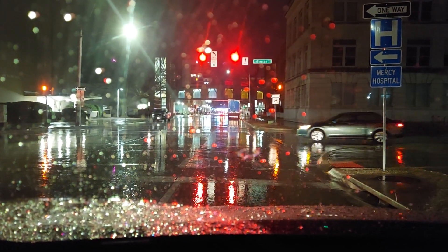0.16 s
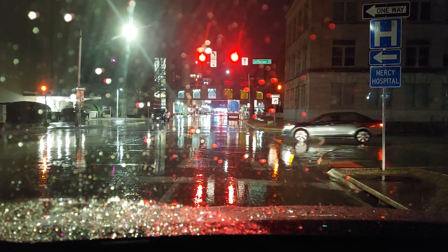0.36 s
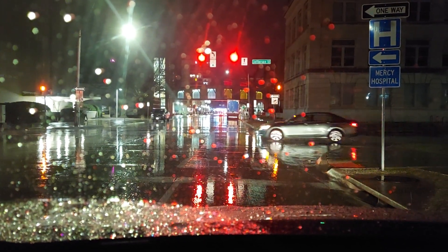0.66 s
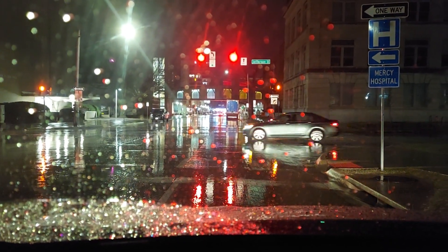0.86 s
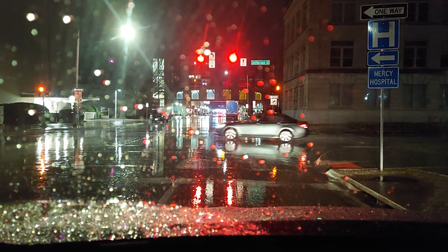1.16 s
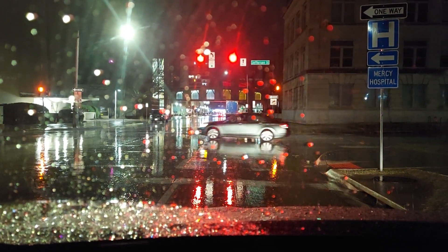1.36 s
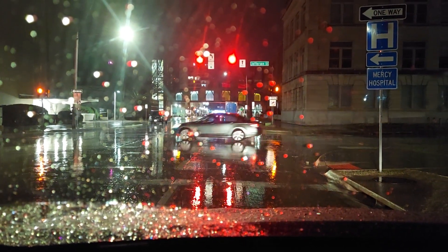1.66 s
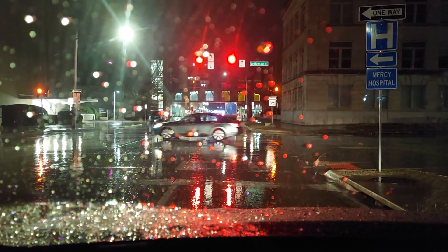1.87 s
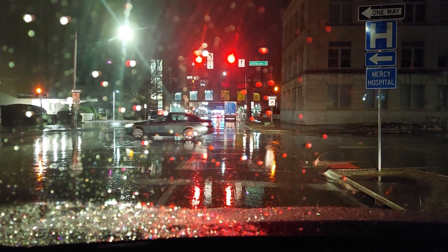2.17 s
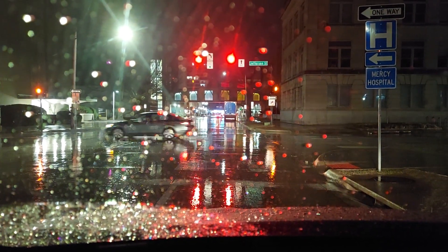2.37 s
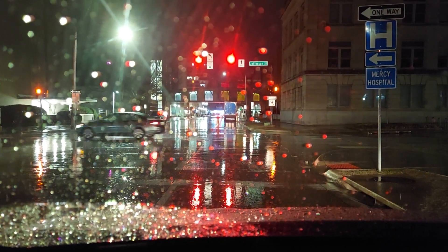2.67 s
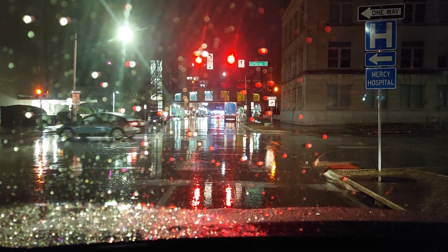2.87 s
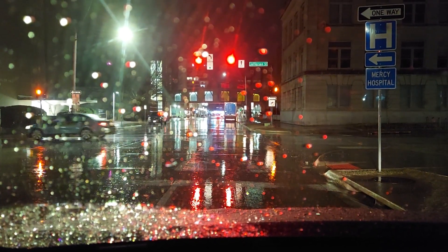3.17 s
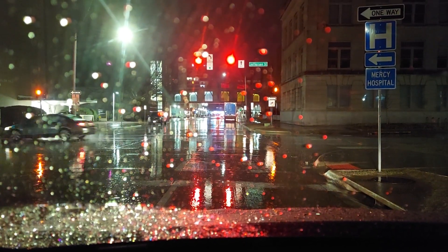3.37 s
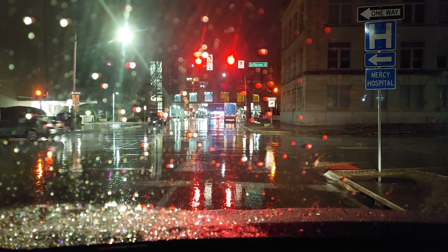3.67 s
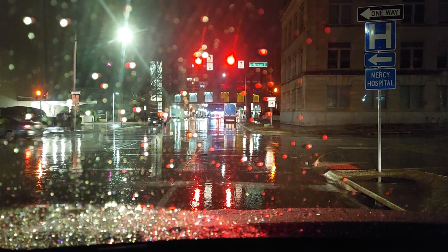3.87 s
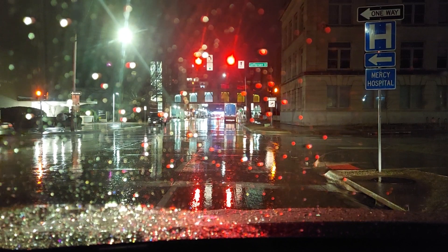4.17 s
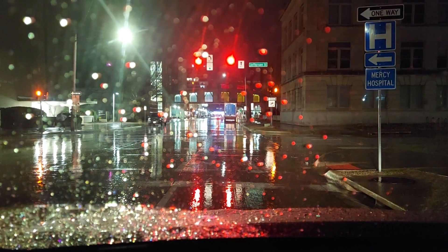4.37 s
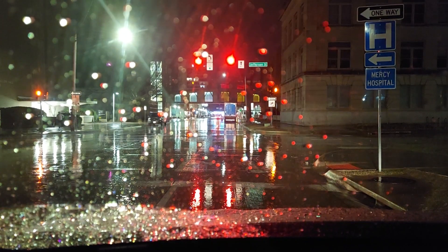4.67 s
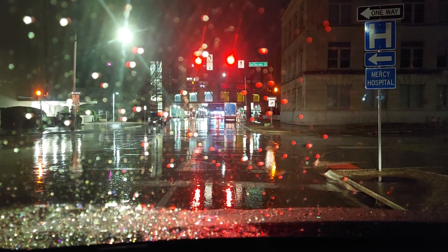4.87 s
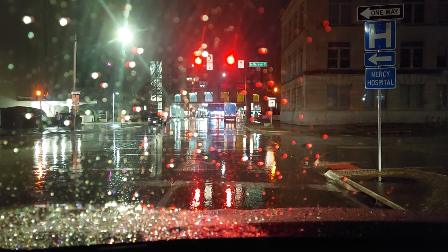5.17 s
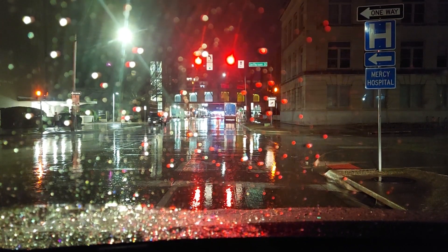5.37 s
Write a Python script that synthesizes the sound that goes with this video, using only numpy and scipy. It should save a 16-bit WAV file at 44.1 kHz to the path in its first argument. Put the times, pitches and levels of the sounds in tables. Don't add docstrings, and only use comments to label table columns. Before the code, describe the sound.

Close stereo sound inside a parked, idling car at night in the rain. Sharp drops click on the windshield and duller ones thud on the lined steel roof, densest in the first two seconds, then sparser and uneven. Underneath are a low engine hum, faint street hiss and a boomy cabin hum that swells briefly around one and a half seconds as a car crosses ahead.

```python
import sys
import numpy as np
from scipy import signal
from scipy.fft import rfft, irfft, next_fast_len
from scipy.io import wavfile
from scipy.ndimage import map_coordinates

SR = 44100
rng = np.random.default_rng(int(sys.argv[2]) if len(sys.argv) > 2 else 0)


def volts_from_decibels(level):
    exponent = np.asarray(level, float) / 20
    return 10 ** exponent


def generate_wav(sig):
    pcm = np.round(np.clip(np.atleast_2d(sig).T, -1, 1) * 32767).astype(np.int16)
    wavfile.write(sys.argv[1], SR, pcm)


N = 244314
T = np.arange(N) / SR


def unit(x):
    return x / np.sqrt(np.mean(x ** 2) + 1e-20)


def along(points, hz):
    f, v = np.transpose(points)
    return np.interp(np.log(hz + 1), np.log(f + 1), v)


def curve(rows, axis):
    return np.interp(T, np.array(rows)[:, 0], np.array(rows)[:, axis])


def wobble(rate):
    return map_coordinates(rng.standard_normal(int(N * rate / SR) + 4), [T * rate])


def filtered(x, response):
    m = next_fast_len(x.shape[-1] + 4096)
    spectrum = rfft(x, m) * response(np.fft.rfftfreq(m, 1 / SR))
    return irfft(spectrum, m)[..., :x.shape[-1]]


def resonant(modes):
    def response(hz):
        total = 0
        for k, (centre, width, db) in enumerate(modes):
            mode = 1j * hz * width / (centre * centre - hz * hz + 1j * hz * width)
            total = total + (-1) ** k * volts_from_decibels(db / 2) * mode
        return total ** 2
    return response


def noise(spectrum):
    return unit(filtered(rng.standard_normal((2, N)), lambda hz: volts_from_decibels(along(spectrum, hz))))


EAR_LAG = rng.integers(-22, 26, size=200)


def answers(click_db, modes, t60, rise):
    t = np.arange(SR // 10) / SR
    count = len(click_db)
    hard = volts_from_decibels(click_db - click_db.mean())[:, None, None]
    fade = volts_from_decibels(-60 * t / t60) + 0.8 * np.sqrt(hard) * volts_from_decibels(-60 * t / (t60 / 5))
    fade *= 1 - np.exp(-t * np.sqrt(hard) / rise)
    fade *= np.cos(5 * np.pi * t)
    echo = rng.standard_normal((count, 2, len(t))) * fade
    echo *= volts_from_decibels(4.53 * rng.standard_normal((count, 2, len(t) // 30)).repeat(30, axis=2))
    echo[:, 0, 40] += volts_from_decibels(click_db)
    echo[np.arange(count), 1, 40 + EAR_LAG[:count]] += volts_from_decibels(click_db)
    spot = [(hz, width, db + rng.normal(0, 1.5, (count, 1, 1))) for hz, width, db in modes]
    out = filtered(echo, resonant(spot))
    return out / np.abs(out).max(axis=(1, 2), keepdims=True)


def place(sounds, seconds, db):
    out = np.zeros((2, N + SR))
    for sound, s, gain in zip(sounds, seconds, volts_from_decibels(db)):
        start = max(round(s * SR), 0)
        out[:, start:start + sound.shape[1]] += gain * sound
    return out[:, :N]


def patter(modes, rate, spread_db, t60, rise, count):
    falls = rng.random((count, N)) < rate / count / SR
    size = np.minimum(rng.exponential(size=(count, N)), 4)
    hits = falls * volts_from_decibels(spread_db * size)
    tails = answers(np.full(count, 10.), modes, t60, rise)
    return unit(signal.fftconvolve(hits[:, None], tails, axes=2)[..., :N].sum(axis=0))


# freq_hz, level_db (per Hz)
RUMBLE_SPECTRUM = [(15, -54), (30, -39), (45, -6), (62, 0), (73, -5), (105, 3.5), (135, -22), (165, -11.5),
                   (350, -11), (520, -28.5), (880, -120)]
# freq_hz, level_db (per Hz)
HISS_SPECTRUM = [(240, -53), (400, -30), (700, -14.5), (1500, -10.5), (3200, -16), (4500, -23.5),
                 (8300, -34.5), (9700, -38), (12000, -30), (15600, -37)]


def street_air():
    street = volts_from_decibels(-64.5 + 0.5 * wobble(18) + 1.4 * wobble(22.02)) * noise(HISS_SPECTRUM)
    return volts_from_decibels(-46 + 0.46 * wobble(3.29)) * noise(RUMBLE_SPECTRUM) + street


# multiple (of the idle rate), level_db (rms)
IDLE_ORDERS = [(2, -48), (3, -57), (4, -61.5), (5, -49), (6, -54.5)]


def engine():
    idle_hz = 20.84
    turn = 2 * np.pi * np.cumsum(idle_hz * (1 + 0.0053 * wobble(2.5))) / SR
    out = 0
    for k, db in IDLE_ORDERS:
        strength = volts_from_decibels(db + 2.5 + .3 * k * wobble(9))
        out = out + strength * np.sin(k * turn + rng.uniform(0, 6))
    return out


# freq_hz, level_db (rms)
WHINE_LINES = [(10200, -95), (10400, -92), (10600, -91), (10800, -92), (11000, -95)]
# time_s, level_db
WHINE_SWITCH = [
    (3.33, -40),
    (3.345, 0),
    (4.915, 0),
    (4.925, -12),
    (4.95, -12),
    (4.96, 0),
    (5.54, 0),
]


def whine():
    lines = sum(volts_from_decibels(db + 5) * np.sin(2 * np.pi * hz * T) for hz, db in WHINE_LINES)
    hiss = unit(filtered(rng.standard_normal((2, N)), resonant([(10760, 870, 0)])))
    chop = unit(np.exp(1.5 * np.cos(2 * np.pi * 200 * T)))
    switch = volts_from_decibels(np.interp(T, *np.transpose(WHINE_SWITCH), left=-60))
    return switch * (lines + volts_from_decibels(-80) * chop * hiss)


def boom():
    level_db, sway_db, rain_share, shake_db = -53, 3, 0.58, 2.5
    pass_s, pass_span_s, pass_db = 1.54, 0.18, 8
    mode = resonant([(128.6, 25.7, 0)])
    rain_db = curve(RAIN, axis=1)
    swell_db = level_db + pass_db / (1 + ((T - pass_s) / pass_span_s) ** 2)
    swell_db = swell_db + rain_share * (rain_db - rain_db.mean()) + sway_db * wobble(2.73)
    hum = volts_from_decibels(swell_db) * unit(filtered(rng.standard_normal(N), mode))
    s, db = np.transpose(ROOF_BLOWS)[:2]
    push = volts_from_decibels(db + shake_db + 39.5) * rng.standard_normal(len(s))
    blows = np.bincount(np.round(s * SR).astype(int), push, N)
    return hum + filtered(blows, mode)


# time_s, level_db
RAIN = [(0, -54), (.18, -51.5), (.59, -55), (.82, -56), (1.08, -51.5), (1.59, -61.5), (1.97, -54),
        (2.33, -65), (2.59, -60), (2.73, -61), (2.96, -56), (3.08, -60.5), (3.49, -63), (3.75, -60),
        (4.58, -58), (4.88, -54.5), (4.98, -62.5), (5.3, -60.5)]
# freq_hz, width_hz, level_db
ROOF_MODES = [(127.6, 49.5, -5), (215, 120, 0), (348.5, 106, -1), (494, 163, -7)]


def shower():
    drum_db, rain_share = -53.5, 0.43
    shell = BODY_MODES + GLASS_MODES + [(4800, 2000, -10), (8000, 2500, -20)]
    fine = patter(shell, 210, 3.5, .045, .0008, count=5)
    drum = patter(ROOF_MODES, 150, 2, .12, .004, count=5)
    rain_db = curve(RAIN, axis=1)
    return volts_from_decibels(rain_db) * fine + volts_from_decibels(drum_db + rain_share * (rain_db - rain_db.mean())) * drum


# start_s, peak_db
TICK_DROPS = [(0.0867, -44), (0.7442, -58), (0.9472, -45), (1.0365, -49), (1.1164, -42.5), (1.3606, -41),
              (1.4102, -42.5), (1.9604, -53), (2.0288, -47), (2.1849, -42), (2.2628, -49), (2.56, -50),
              (3.0964, -57), (3.3009, -49), (3.322, -41), (3.4715, -53), (3.4984, -54), (3.7319, -59),
              (3.7658, -61), (3.8048, -64), (3.8686, -47), (3.888, -42.5), (3.9304, -50), (3.9749, -45),
              (4.221, -36), (4.2662, -47), (4.6114, -44), (4.9137, -55), (5.3502, -48), (5.5174, -60)]
# freq_hz, width_hz, level_db
TICK_MODES = [(3170, 1800, 0), (5460, 1650, -5.5), (8900, 1900, -13.5)]


def ticks():
    s, db = np.transpose(TICK_DROPS)
    clear = answers(np.full(len(s), 22.), TICK_MODES, t60=0.065, rise=0.0012)
    sprinkle = patter(TICK_MODES, 90, 1.2, 0.023, 0.00026, count=5)
    return place(clear, s, db - 1.5) + volts_from_decibels(curve(RAIN, axis=1) - 14) * sprinkle


# start_s, peak_db, panel_hz, knock_db
ROOF_BLOWS = [(.001, -27.5, 231, -7), (.171, -35, 215, 1.5), (.239, -31, 182, -13.5), (.317, -39.5, 240, 1),
              (.536, -31.5, 218, -13), (.68, -38.5, 187, -5.5), (.796, -38, 182, 0),
              (.893, -22.5, 229, -16), (0.973, -38, 320, -18), (1.168, -37, 198, -5),
              (1.271, -45, 226, -15), (1.491, -43.5, 326, -1.5), (1.547, -45, 322, 0.5),
              (2.481, -44, 288, -7), (2.68, -38, 190, -6), (2.709, -32, 180, -30),
              (2.893, -27.5, 209, -11.5), (3.015, -36, 199, -15), (3.411, -31.5, 215, -12.5),
              (3.639, -38.5, 166, -2.5), (3.745, -43, 187, -27), (4.13, -32, 263, -10.5),
              (4.39, -32, 203, -8), (4.541, -45.5, 200, -0.5), (4.685, -42.5, 195, -16),
              (4.775, -37.5, 200, -4), (5.021, -35, 232, -9.5), (5.26, -31.5, 256, -11),
              (5.287, -29, 170, -2), (5.411, -41.5, 194.5, -14)]
# freq_hz, width_hz, level_db
KNOCK_MODES = [(371, 112, 3.5), (544, 119, 0), (769, 125, -5)]


def thuds():
    t = np.arange(SR // 6) / SR
    s, db, hz, knock_db = np.transpose(ROOF_BLOWS)
    detune = rng.normal(0, 0.227, (len(s), 2, 1)) * [[0], [1]]
    pitch = hz[:, None, None] * np.exp(detune)
    phase = rng.uniform(0, 3.16, (len(s), 2, 2, 1))
    ring = np.sin(2 * np.pi * pitch[:, None] * t + phase) * volts_from_decibels([[0], [-7]])
    ring = ring.sum(axis=2) * volts_from_decibels(-60 * t / 0.12) * (1 - np.exp(-t / 0.00093))
    knock = answers(np.full(len(s), 22.), KNOCK_MODES, t60=.13, rise=.004)
    return place(ring, s - .002, db - 4) + place(knock, s - .002, db + knock_db + 7.0)


# start_s, tap_db, body_db, splash_db
GLASS_DROPS = [(.0423, -24.5, -14, -16), (.3197, -21, -11.5, -16), (.3471, -32.5, -14, -9.5),
               (.4179, -30.5, -14, -11.5), (.4682, -32, -13, -10), (.5386, -34, -2, -15),
               (.6065, -44.5, -27, -4), (.8104, -45, -13, -16.5), (.8854, -35, -5, -14),
               (.9773, -33, -27, -20), (1.278, -38.5, -11, -18.5), (1.494, -30, -10, -15.5),
               (1.5359, -38.5, -18, -35), (1.5494, -23, -11.5, -14), (1.5994, -43, -10, -9.5),
               (1.701, -41.5, -13, -16), (1.988, -46.5, -16, -18), (2.1282, -41, -18, -13.5),
               (2.4834, -27.5, -6.5, -18.5), (3.8521, -39, -8, -21), (3.9547, -43, -6, -15),
               (4.1136, -39.5, -15, -18), (4.1306, -27, -11.5, -17), (4.2909, -43.5, -13, -11),
               (4.3915, -28.5, -7.5, -15.5), (4.4528, -38, -12, -20), (4.779, -28.5, -10, -13.5),
               (4.8577, -37.5, -7, -35), (4.952, -40.5, -33, -20), (5.2586, -28.5, -11, -13.5)]
# start_s, tap_db, body_db, splash_db
ROOF_DROPS = [(.0014, -36, -0.5, -11.5), (.1123, -32.5, -13, -9.5), (.1535, -30.5, -8.5, -10.5),
              (.1782, -36, 1, -11), (.2144, -37.5, -6, -10), (.2395, -35, -7, -11), (.4447, -34, -14, -26),
              (.6764, -41.5, -1, -9.5), (.7733, -32, -11, -11), (.7986, -31, -8, -9.5),
              (.89, -30.5, -1.5, -18), (1.073, -42, -10, -10), (1.1697, -39, -2, -8.5),
              (1.3738, -41.5, -4, -9), (1.752, -42.5, -3, -15), (1.797, -37, -15, -12),
              (1.8998, -40, -7, -11), (2.6745, -40.5, 0, -16.5), (2.7908, -45.5, 2, -13),
              (2.829, -37.5, -2, -8.5), (2.8881, -35.5, -1, -17.5), (3.0107, -42, -5.5, -16.5),
              (3.4039, -48.5, 7, -12), (3.6388, -41.5, 2.5, -13), (4.4275, -39, -14, -16),
              (4.708, -40, -14, -20), (4.8314, -41.5, 0, -15), (4.9772, -37.5, -5.5, -15),
              (4.9956, -40, -1.5, -10), (5.2824, -36, -1.5, -26)]
# start_s, tap_db, body_db
LIGHT_DROPS = [(.2715, -35.5, -15), (.405, -52, -16), (.513, -38, -9), (.618, -37, -18), (.6484, -38, -11),
               (1.002, -47, -9), (1.1963, -44.5, 1), (1.2361, -45, -10), (1.3219, -47, -1),
               (1.448, -47.5, -6), (1.8572, -45.5, -17), (2.0646, -43.5, -6.5), (2.2262, -55, -22),
               (2.3396, -45, -8.5), (2.581, -49.5, 3), (2.6354, -47, -4), (3.1363, -43.5, -11),
               (3.183, -43, -13), (3.273, -46.5, 3), (3.355, -44.5, -13), (3.3776, -42.5, -6),
               (3.997, -46, -18), (4.0164, -44, -3), (4.1888, -43, -6), (4.5386, -45.5, 1),
               (4.6404, -42.5, -29), (4.68, -49, -4), (5.0153, -43, -3), (5.154, -46, -15),
               (5.207, -44, -13)]


def clear_drops():
    strays, stray_db, stray_body_db, scatter_db = 30, 10.5, -7, 1.5
    chance = rng.standard_normal((strays, 3))
    s = (np.arange(strays) + rng.random(strays)) * N / SR / strays
    tap = np.interp(s, *np.transpose(RAIN)) + stray_db + scatter_db * chance[:, 0]
    body = stray_body_db + 1.5 * scatter_db * chance[:, 1]
    light = np.r_[LIGHT_DROPS, np.c_[s, tap, body]]
    light = np.c_[light, -16.5 - 7.5 * rng.standard_normal(len(light))]
    drops_by_kind = []
    for rows, click_db in [(GLASS_DROPS, 10), (ROOF_DROPS, -1), (light, 2.5)]:
        clicks = click_db + 2 * rng.standard_normal(len(rows))
        drops_by_kind.append(np.c_[rows, clicks])
    return np.vstack(drops_by_kind)


# freq_hz, width_hz, level_db
GLASS_MODES = [(1536, 367, 0), (2137, 1760, -1.5), (3320, 1060, 3.5), (4300, 1790, -13)]
# freq_hz, width_hz, level_db
BODY_MODES = [(505, 134, 2), (734, 243, 6), (1111, 256, 5.5), (1435, 175, 1)]
# freq_hz, width_hz, level_db
SPLASH_MODES = [(5660, 4740, 19), (8300, 20000, -37), (11200, 820, -8)]


def drops():
    s, db, body_db, splash_db, click_db = clear_drops().T
    tap = answers(click_db + 22, GLASS_MODES, t60=.135, rise=.0012)
    body = answers(click_db + 20, BODY_MODES, t60=.11, rise=.003)
    splash = answers(click_db + 14, SPLASH_MODES, t60=.12, rise=.0015)
    out = place(tap, s, db + 3.5)
    out += place(body, s, db + body_db + 5.5)
    return out + place(splash, s, db + splash_db + 7.5)


# freq_hz, likeness (correlation)
EAR_LIKENESS = [(60, 1), (130, 0.76), (290, 0.8), (640, 0.3), (1410, 0.33), (3100, -0.16), (6820, 0.35),
                (15000, -0.13)]


def blend(pair):
    def turn(hz):
        return np.arcsin(np.clip(along(EAR_LIKENESS, hz), 0, 1)) / 2
    own = filtered(pair, lambda hz: np.cos(turn(hz)))
    return own + filtered(pair[::-1], lambda hz: np.sin(turn(hz)))


def scene():
    around = drops() + thuds() + shower() + ticks() + street_air()
    return blend(around) + engine() + boom() + whine()


def roll_off(x):
    return signal.sosfilt(signal.butter(12, 15720, fs=SR, output="sos"), x)


def record(dry):
    # freq_hz, left_db (the right is its opposite)
    tilt_db = [(40, 0.38), (90, 1.2), (250, 0.27), (1000, 0.7), (2500, -0.46), (12000, -0.65)]

    def microphones(hz):
        return volts_from_decibels(along(tilt_db, hz) * np.array([[1], [-1]])) * (hz < 15700)
    return roll_off(filtered(dry, microphones))


dry = scene()
out = record(dry)
generate_wav(out)
```